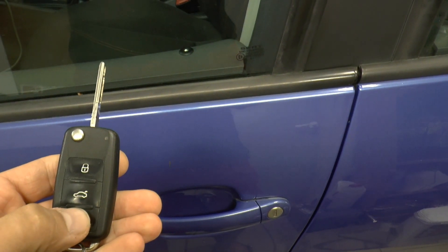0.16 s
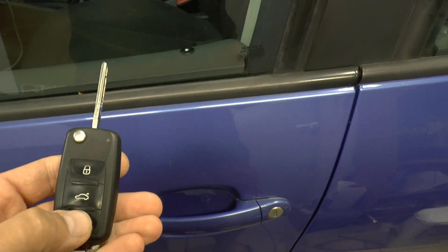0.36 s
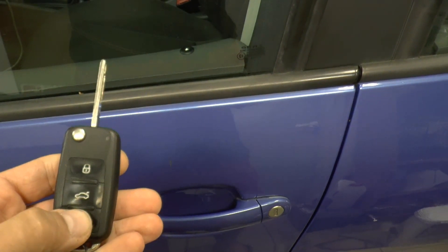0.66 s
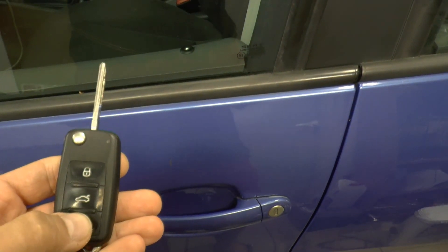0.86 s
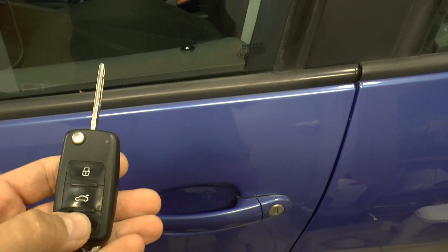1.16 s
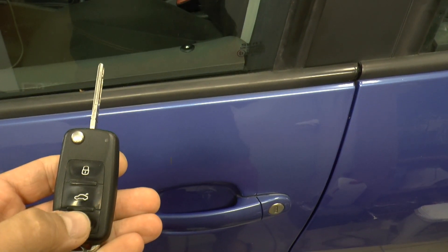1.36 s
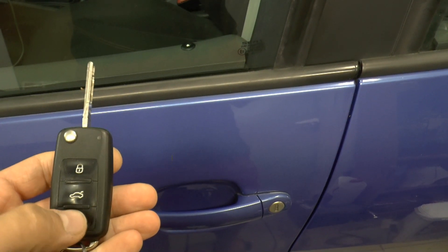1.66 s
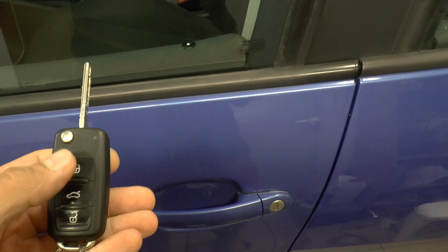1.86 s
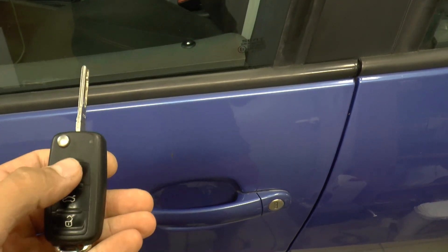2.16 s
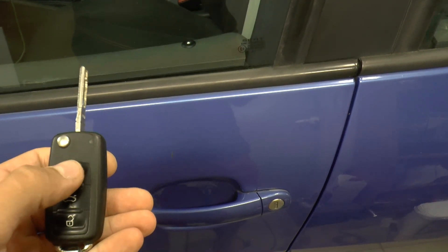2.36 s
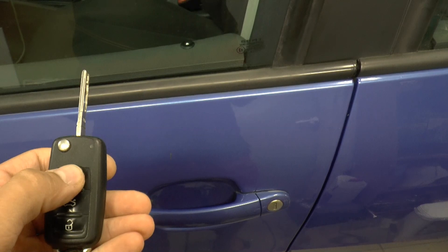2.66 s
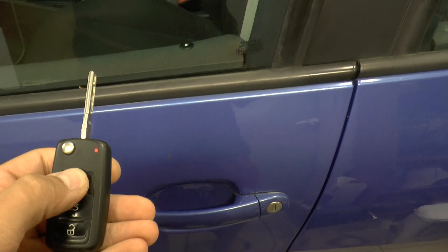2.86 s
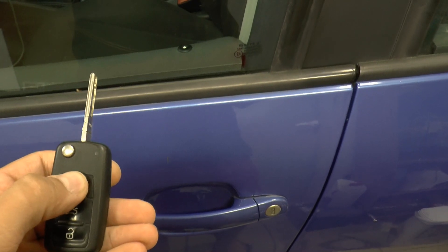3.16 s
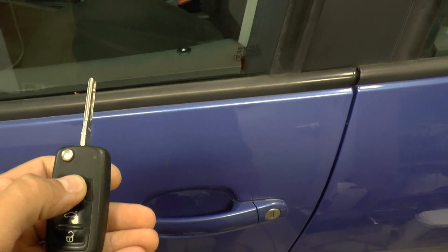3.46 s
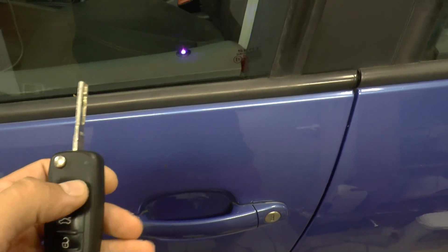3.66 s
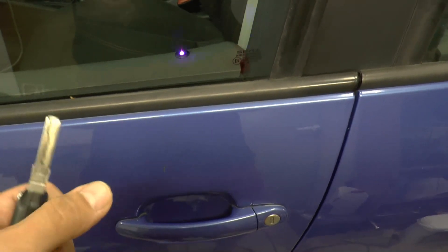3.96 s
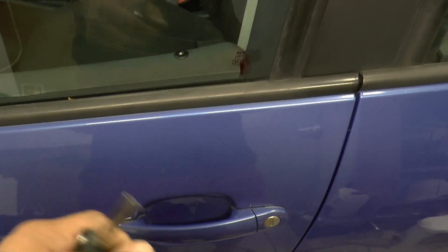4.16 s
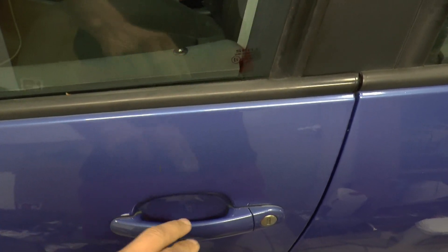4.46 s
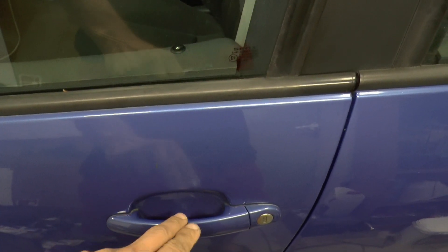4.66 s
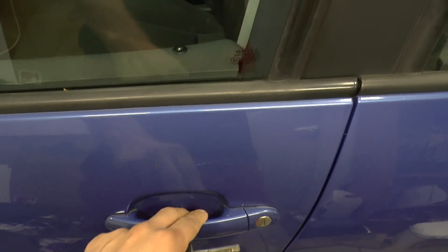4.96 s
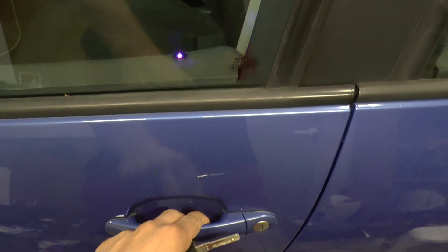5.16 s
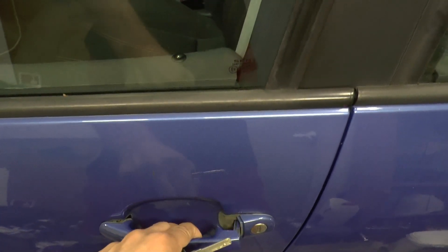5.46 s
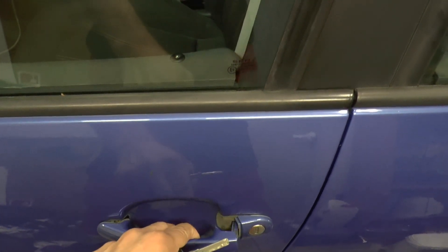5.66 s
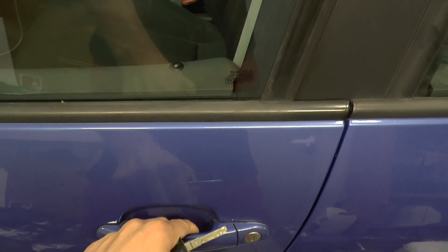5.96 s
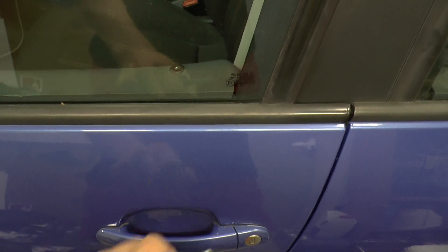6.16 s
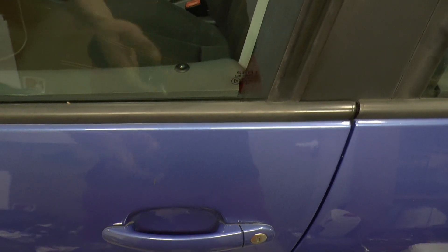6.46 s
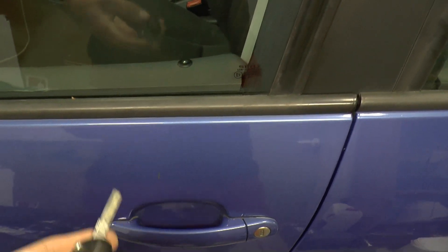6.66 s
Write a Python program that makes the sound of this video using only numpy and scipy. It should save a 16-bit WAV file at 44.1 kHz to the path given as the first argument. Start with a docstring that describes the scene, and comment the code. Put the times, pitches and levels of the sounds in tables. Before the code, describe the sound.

Car door locks clunk hard twice to unlock and twice to lock, then keys clink and a door handle creaks, knocks and snaps back.

```python
"""Door locks of a parked car in a quiet garage, heard from beside the driver's door. The lock actuators make
two strokes to unlock and two to lock: filtered noise blows, each a loud clunk and a soft spring return.
Key fob buttons click, and key and fob clack in the hand as short snaps with struck resonances. The door
handle is pulled to its stop, a stick-slip groan, and let go; its knocks excite the modes of the door.
Sleeve rub is uneven noise; room noise, a brief low drone and a faint motor whine of sines lie underneath."""
import sys
import numpy as np
from scipy import signal
from scipy.fft import rfft, irfft
from scipy.io import wavfile
from scipy.ndimage import uniform_filter1d

SR = 44100
rng = np.random.default_rng(int(sys.argv[2]) if len(sys.argv) > 2 else 0)


def unload_audio(sound):
    """Save the sound as a 16-bit wav file, at the path given as the first command line argument."""
    columns = np.transpose(np.atleast_2d(sound))
    # keep every value between -1 and 1, then stretch to whole-number steps
    steps = np.round(np.clip(columns, -1, 1) * 32767)
    wavfile.write(sys.argv[1], SR, steps.astype(np.int16))


N = 300762  # length in samples
SIZE = 24576  # longest single sound in samples
TIME = np.arange(N) / SR  # seconds into the scene
AGE = np.arange(SIZE) / SR  # seconds since a sound began
FREQ = np.maximum(np.fft.rfftfreq(SIZE, 1 / SR), 1)  # Hz
DECAY_60_DB = np.log(1000)  # exponent of a 60 dB decay

# Levels are relative: each sound's own function may add a gain.

# Spread of reflections between the microphones. Each row: frequency in Hz, side minus mid in dB.
MIC_SPREAD = [(25, -3), (70, -10.5), (150, -7), (500, -9), (1200, -11.5), (2200, -18), (4000, -18.5),
              (8000, -14)]
# Colour of the room air. Each row: frequency in Hz, density in dB per Hz.
AIR_COLOUR = [(15, -53), (25, -17), (64, 0.5), (101, -6), (215, -3), (289, -6), (368, -2.5), (469, -14.5),
              (598, -6), (1300, -22), (1660, -7.5), (2770, -8), (6730, -22.5), (11800, -18), (15500, -27)]
AIR_DB = -68.0
# Tones of a small motor. Each row: frequency in Hz, rms level in dB before the common lift.
WHINE_TONES = [(624.5, -87.5), (748.3, -87.5), (1061, -91), (1184, -92.5), (1249, -94), (1373, -89.5),
               (1626, -84.5), (1809, -81.5), (1933, -89), (1997, -90.5), (2180, -100.5), (2778, -84),
               (3090, -87), (3176, -89), (3225, -94), (3526, -86.5), (4199, -96), (4802, -93), (5098, -99),
               (5399, -92.5)]
WHINE_LIFT_DB = 1.16
# Colour of the low drone. Each row: frequency in Hz, density in dB per Hz.
DRONE_COLOUR = [(50, -43), (68, -24.5), (74, 2), (80, -13.5), (110, -46.5)]
# Course of the low drone. Each row: time in seconds, level in dB.
DRONE_COURSE = [(0, -86), (1.0, -71.0), (1.8, -83.5), (2.3, -105)]

# Decay in and around the car. Each row: frequency in Hz, t60 in seconds before stretching.
CAR_DECAY = [(60, 1), (180, 0.46), (500, 0.31), (1200, 0.21), (3000, 0.29), (6000, 0.27), (14000, 0.23)]
# Colour of a click. Each row: frequency in Hz, density in dB per Hz.
CLICK_COLOUR = [(100, -15), (950, -37.5), (1700, -2), (3000, -2.5), (4600, -2.5), (6000, -6.5),
                (10000, -11), (15000, -21)]
# Resonances of the fob, key blade and ring. Each row: frequency in Hz, level in dB, t60 in seconds.
KEY_MODES = [(1790, -14, 0.062), (2450, -17, 0.074), (3020, -4, 0.11), (3620, -3, .06), (5700, 3, 0.031),
             (6370, 5, 0.018), (7150, 1, .035), (10000, 1.5, 0.011)]
# Presses of the fob's buttons. Each row: start in seconds, level in dB.
BUTTON_PRESSES = [(0.4409, -47.5), (2.9155, -39.5), (3.129, -50)]
# Snaps of the latch pawl. Each row: start in seconds, level in dB.
LATCH_SNAPS = [(5.3151, -45), (5.8378, -27.5), (5.9363, -35)]

# Lock strokes, two to unlock and two to lock. Each row: start in seconds, travel in seconds,
# first blow in dB, its treble in dB, stop in dB, stop bass in dB, stop crack in dB, thud in dB,
# sway in dB, spring return in dB, run-back in seconds.
LOCK_STROKES = [(.691, .0135, -28, -4, -19.5, 1, -8.5, -25, -32, -40.5, 0.062),
                (1.0392, .0207, -22, -5, -17, -5.5, 4, -31, -38, -37.5, .04),
                (3.158, .0262, -28.5, -4, -19, 1.5, -4, -33, -34.5, -37, .06),
                (3.461, 0.027, -26, 1, -20.5, 2, -3.5, -27, -42, -42, .035)]
# Colour of the lock mechanism's rattle. Each row: frequency in Hz, density in dB per Hz.
RATTLE_COLOUR = [(30, -28.5), (90, -11), (150, -7.5), (430, -0.5), (485, -8), (560, -1.5), (760, -1.5),
                 (920, -10.5), (1250, -4.5), (1700, -1), (2400, 3), (4500, -4), (11500, -21), (15000, -35)]
# Door panel and cavity modes. Each row: frequency in Hz, level in dB, t60 in seconds.
DOOR_MODES = [(71.7, -21, 0.99), (139.1, -0.5, 0.37), (160, -6, 0.33), (210.3, -3.5, 0.24),
              (236.1, -4, 0.28), (287, -3, 0.21), (338.7, -14.5, 0.24), (411.3, 0, 0.11),
              (554.5, -0.5, 0.15), (589, -7, 0.22), (713, -7.5, 0.26), (709.3, 3, 0.36), (762, -3.5, 0.1),
              (805, 3, .2), (1400, 2.5, 0.14), (1653, -6, 0.13), (1730, 0.5, 0.1), (2134, -11.5, 0.068),
              (2327, -10, 0.24), (2830, -10, 0.26)]
# Resonances of the lock housing. Each row: frequency in Hz, level in dB; only differences count.
HOUSING_MODES = [(2062, -52), (2169, -52), (2272, -53.5), (2315, -49.5), (2762, -52), (3548, -56),
                 (3865, -57), (3967, -57), (4355, -60)]
HOUSING_WIDTH_HZ, HOUSING_GAIN = 14, 0.7
# The actuators lie to the right. Each row: frequency in Hz, left minus right in dB.
LOCK_LEAN = [(200, 0), (500, -.8), (1000, -3.4), (2000, -3.4), (4000, -1.5), (8000, -2), (13000, -1.3)]
LOCK_WIDTH, HAND_PAN_DB = 1.3, 1.1  # the door panel radiates broadly; the hand is a little to the left
SPIN_UP_S, MOTOR_DB, RUN_BACK_DB = .016, -50.5, -41.5
LEVER_LEAD_S, LEVER_DB = .0085, -4.5  # the lever trips just before the stop; level against the stop
REBOUND_S, REBOUND_DB = .0115, -4  # one bounce back from the stop; level against the stop
POWER_S, SETTLE_S = .246, .0105  # power is cut; a spring takes up the gears, which then settle
ROD_HZ, SWAY_S, SWAY_HZ = 300, .034, 153  # the rod thuds at the stop, then the door skin swings back
SETTLE_THUD_DB = -4.5  # level against the spring return

# Clinks of fob, blade and ring in the hand. Each row: start in seconds, level in dB, ring in Hz,
# treble in dB, metal share from 0 to 1, tail in dB.
KEY_CLINKS = [(3.903, -39.5, 2650, 9, .15, -11), (3.9561, -37.5, 2370, 0, 0.5, -9),
              (4.0129, -33, 2530, 12, .5, -7.5), (4.0204, -39, 10000, 4, .5, -7),
              (4.591, -46, 3400, -10.5, 0.2, -10), (4.9786, -46.5, 2380, 7.5, 0.93, -8),
              (6.6133, -41, 2580, 4, .5, -12), (6.6925, -43.5, 3160, 10, 1, -12),
              (6.7472, -24.5, 2926, 7, .9, -14)]
BOUNCE_S, BOUNCE_DB = .0025, -6  # parts touch twice; the metal share also scales the second touch
JINGLE_S, JINGLE_LENGTH_S, JINGLE_DB = 3.2, 0.031, -46  # the ring rattles lightly as the key is turned over
SUSTAIN_DB, SUSTAIN_T60_S = -13, .09  # the struck metal part rings on
# Rubs of sleeve and hand with each move. Each row: middle in seconds, length in seconds, level in dB.
SLEEVE_RUBS = [(3.943, 0.23, -58.5), (4.204, 0.25, -60.5), (5.422, .22, -58), (5.937, 0.19, -57.5),
               (6.359, 0.28, -61), (6.72, 0.26, -63)]
# Colour of the rubbing. Each row: frequency in Hz, density in dB per Hz.
SLEEVE_COLOUR = [(180, -58.5), (300, -10.5), (403, -0.5), (490, -17), (726, -7), (991, -25), (1760, -7),
                 (2970, -1.5), (15000, -26)]
REST_DB = -71  # from the middle of the first rub on, the hand is never quite still
# Scrapes of the key on its ring. Each row: start in seconds, length in seconds, pitch in Hz, level in dB.
KEY_SCRAPES = [(3.954, 0.053, 2680, -51.5), (6.554, 0.056, 3250, -62.5), (6.672, 0.039, 3100, -59)]

# Knocks of the handle on the door skin. Each row: start in seconds, thud in dB, contact in Hz, rattle in dB.
HANDLE_KNOCKS = [(4.893, -55, 166, -67), (5.314, -36.5, 210, -41.5), (5.4944, -20, 153, -37),
                 (5.971, -36.5, 199, -44), (6.011, -33.5, 245, -45)]
# The handle linkage is softer than the lock gears. Each row: frequency in Hz, gain in dB.
LINKAGE_TONE = [(150, -1.5), (400, 6), (650, 2.5), (1100, 4), (2500, -4), (8000, -9.5)]
# The handle bumps ever harder as it slides home.
SLIDE_S, SLIDE_LENGTH_S, SLIDE_RATTLE_DB = 5.867, .131, -53.5
SLIDE_DB, SLIDE_DB_PER_S, SLIDE_HZ, SLIDE_HZ_PER_S = -45.5, 36, 204, 600
# The hinge is loaded, then groans until the handle meets its stop.
LOAD_S, GROAN_S, GROAN_END_S, GROAN_ATTACK_S = 5.2, 5.362, 5.495, 0.0079
# The slip rate climbs during the load, peaks as the groan starts and then sags.
LOAD_DB, GROAN_DB, GROAN_HZ, SAG_HZ_PER_S = -58, -42.5, 216, 210
# Colour of the linkage's rasp. Each row: frequency in Hz, density in dB per Hz.
RASP_COLOUR = [(35, -42), (100, -19), (260, 15), (480, -20), (800, 2.0), (950, -21.5), (1500, -13), (5000, -34)]
# Modes of the fob's plastic case. Each row: frequency in Hz, level in dB, t60 in seconds.
CASE_MODES = [(1400, -1, 0.025), (1625, -2.5, 0.035), (1890, -1.5, 0.04), (2230, -10, 0.048)]
CLACK_S, CLACK_DB = 6.6398, -28  # the case knocks once
TOP_HZ = 15300  # upper limit of the recorder


def undb(db):
    """Decibels to gain."""
    return 10 ** (np.asarray(db) / 20)


def curve(points, hz=FREQ):
    """Read (Hz, value) points on a log-frequency axis."""
    f, value = np.transpose(sorted(points))
    return np.interp(np.log(hz), np.log(f), value)


def unit(x):
    """Scale to rms 1."""
    return x / np.sqrt(np.mean(x ** 2))


def add(out, s, sound):
    """Mix a sound in at time s."""
    start = int(s * SR)
    out[:, start:start + SIZE] += sound[..., :N - start]


def colour(x, gain):
    """Causal, minimum-phase filter with the given gain at each frequency."""
    cepstrum = irfft(np.log(gain + 1e-6))
    cepstrum[1:SIZE // 2] *= 2
    cepstrum[SIZE // 2 + 1:] = 0
    return irfft(rfft(x) * np.exp(rfft(cepstrum)))


def noise(size, width):
    """Spectrum of stereo noise; width scales how unlike the two sides are."""
    hz = np.maximum(np.fft.rfftfreq(size, 1 / SR), 1)
    mid, side = rfft(rng.standard_normal((2, size)))
    side = side * width * undb(curve(MIC_SPREAD, hz))
    return np.array([mid + side, mid - side]), hz


def wash(points, width):
    """Steady stereo noise of a given colour."""
    spectrum, hz = noise(N, width)
    return unit(irfft(spectrum * undb(curve(points, hz)), N))


def uneven(length, count):
    """Loosely spaced moments over a length of time."""
    jitter = rng.uniform(-.1, .1, count) / count
    return length * (np.linspace(0, 1, count) + jitter)


def pan(x, points):
    """Lean each band to the left by its dB."""
    hz = np.maximum(np.fft.rfftfreq(N, 1 / SR), 1)
    lean = undb(curve(points, hz) / 2)
    return irfft(rfft(x) * np.array([lean, 1 / lean]), N)


def background():
    """Room air and a small motor's steady whine, with a low drone that swells for a second and fades away."""
    whine = np.zeros(N)
    for hz, db in WHINE_TONES:
        whine += undb(db) * np.sqrt(2) * np.sin(2 * np.pi * (hz * TIME + rng.random()))
    drone = wash(DRONE_COLOUR, width=0.98)
    drone_db = np.interp(TIME, *np.transpose(DRONE_COURSE))
    air = undb(AIR_DB) * wash(AIR_COLOUR, width=1.92)
    return air + undb(WHINE_LIFT_DB) * whine + undb(drone_db) * drone


def tail(stretch):
    """Dense reflections; each band dies at its own rate."""
    spectrum, _ = noise(SIZE, width=0.74)
    out = np.zeros((2, SIZE))
    for hz, t60 in CAR_DECAY:
        # each band fades out towards its neighbours' frequencies
        band = curve([(f, float(f == hz)) for f, _ in CAR_DECAY])
        out += irfft(spectrum * band) * np.exp(-DECAY_60_DB * AGE / (t60 * stretch))
    return out


def crack(t60, snap):
    """The direct sound of a contact: a sharp snap and a brief chatter."""
    spectrum, _ = noise(SIZE, width=0.87)
    sound = irfft(spectrum) * (undb(-60 * AGE / t60) + snap * np.exp(-AGE / 0.0014))
    # same energy as 2 ms of rms 1
    return sound / np.linalg.norm(sound[0]) * np.sqrt(SR / 500)


def emphasis(modes, blur):
    """Gain of a body that favours the neighbourhood of its modes; blur widens each peak."""
    hz, db, t60 = np.transpose(modes)[..., None]
    half_width = blur * DECAY_60_DB / (2 * np.pi * t60)
    return np.sum(undb(db) / (1 + ((FREQ - hz) / half_width) ** 2), axis=0)


def click(ring_hz, width_hz, peak, treble_db, metal, room_db):
    """A small hard part snaps with one broad resonance; metal contacts bring out the key's modes."""
    resonance = 1 + peak / (1 + ((FREQ - ring_hz) / width_hz) ** 2)
    metal_body = 1 + 2 * metal * emphasis(KEY_MODES, blur=2.4)
    tone = undb(curve([(3500, 0.0058), (8000, treble_db)]))
    gain = unit(undb(curve(CLICK_COLOUR)) * metal_body * resonance) * tone
    snap = crack(t60=.015, snap=2.6)
    return undb(-3.0) * colour(snap + undb(room_db) * tail(stretch=0.55), gain)


def snaps():
    """The plastic buttons tick close by; the latch pawl snaps in the door with more of the room."""
    out = np.zeros((2, N))
    for s, db in BUTTON_PRESSES:
        tick = click(ring_hz=2130, width_hz=350, peak=3.3, treble_db=-4.5, metal=0.36, room_db=-18)
        add(out, s, undb(db) * tick)
    for s, db in LATCH_SNAPS:
        snap = click(ring_hz=3500, width_hz=490, peak=2.5, treble_db=-4.5, metal=0.32, room_db=-8.5)
        add(out, s, undb(db) * snap)
    return out


def door_colour():
    """Anything that rattles inside the door is heard through its panel."""
    return unit(undb(curve(RATTLE_COLOUR)) * (1 + 1.3 * emphasis(DOOR_MODES, blur=2.4)))


def whirr(running, treble_db):
    """A small motor turns for a moment; its gear teeth chop the noise."""
    teeth = 1 + 0.42 * np.sin(2 * np.pi * 380 * AGE)
    tone = door_colour() * undb(curve([(1000, 0.00046), (7000, treble_db)]))
    gears = colour(irfft(noise(SIZE, width=.9)[0]) * teeth * running, tone)
    hum = 0.73 * running * np.sin(2 * np.pi * 755 * AGE)
    return undb(-6) * (gears + hum)


def motors():
    """The motors drive each stroke, then are spun back by the spring and coast to rest."""
    out = np.zeros((2, N))
    for s, travel, *_, run_back in LOCK_STROKES:
        driven = np.clip(np.minimum(AGE, SPIN_UP_S + travel - AGE) / 0.0089, 0, 1)
        coasting = np.minimum(AGE / .008, 1) * np.exp(-AGE / run_back)
        add(out, s - SPIN_UP_S, undb(MOTOR_DB) * whirr(driven, treble_db=-1.5))
        add(out, s + POWER_S + SETTLE_S, undb(RUN_BACK_DB) * whirr(coasting, treble_db=-10))
    return out


def housing():
    """The lock's casing favours a few narrow bands."""
    hz, db = np.transpose(HOUSING_MODES)[..., None]
    peaks = undb(db - db.max()) / (1 + ((FREQ - hz) / HOUSING_WIDTH_HZ) ** 2)
    return 1 + HOUSING_GAIN * np.sum(peaks, axis=0)


def blow(bass_db, treble_db, crack_db):
    """A gear or lever hits its stop inside the door; loose parts bounce, then settle."""
    tone = undb(curve([(600, bass_db), (1500, 0.0055), (3000, 0.029),
                       (6500, treble_db), (12000, treble_db), (15500, treble_db - 11)]))
    through_door = 1 - np.exp(-AGE / 0.0013)  # the blow takes a moment to spread through the panel
    settling = np.exp(-AGE / 0.025)
    flutter = unit(uniform_filter1d(rng.standard_normal(SIZE), size=90))
    bounces = undb(2.64 * flutter * settling)
    clatter = tail(stretch=0.84) * (1 + 0.5 * settling) * bounces
    contact = undb(crack_db) * crack(t60=0.015, snap=1.2)
    return colour(undb(-6.5) * clatter * through_door + contact, door_colour() * housing() * tone)


def actuators():
    """Each stroke takes up the slack, trips the lever, hits the stop and rebounds; later a spring pulls it back."""
    out = np.zeros((2, N))
    for s, travel, first_db, first_treble_db, stop_db, bass_db, crack_db, _, _, return_db, run_back in LOCK_STROKES:
        stop, cut = s + travel, s + POWER_S
        add(out, s, undb(first_db) * blow(bass_db=2.5, treble_db=first_treble_db, crack_db=-9))
        add(out, stop - LEVER_LEAD_S, undb(stop_db + LEVER_DB) * blow(bass_db=1.5, treble_db=3.5, crack_db=-10))
        add(out, stop, undb(stop_db) * blow(bass_db, treble_db=0.9, crack_db=crack_db))
        rebound = blow(bass_db / 2, treble_db=-2.0, crack_db=-13.5)
        add(out, stop + REBOUND_S, undb(stop_db + REBOUND_DB) * rebound)
        # spring return: take-up, settling, and one more blow during the run-back
        add(out, cut, undb(return_db - 6) * blow(bass_db=6, treble_db=-5, crack_db=-5))
        add(out, cut + SETTLE_S, undb(return_db) * blow(bass_db=5, treble_db=-11, crack_db=-6.5))
        add(out, cut + run_back / 2, undb(return_db - 4) * blow(bass_db=7.5, treble_db=-10.5, crack_db=-14))
    return out


def ring(modes, scatter_db):
    """Struck modes; every blow excites them a little differently."""
    hz, db, t60 = np.transpose(modes)[..., None]
    size, detune = rng.standard_normal((2, len(modes), 1))
    age = AGE[:SIZE * 3 // 4]  # the rest stays silent
    waves = np.sin(2 * np.pi * hz * (1 + 0.005 * detune) * age) * np.exp(-DECAY_60_DB * age / t60)
    return np.pad(np.sum(undb(db + scatter_db * size) * waves, axis=0), (0, SIZE // 4))


def low_cut(hz):
    """A small panel radiates little below its size."""
    return 1 / np.sqrt(1 + (hz / FREQ) ** 4)


def thud(contact_hz):
    """A cushioned knock pushes the door skin slowly, so mostly its low modes answer."""
    ratio = FREQ / contact_hz
    band = 1 / np.sqrt(1 + (2.7 * (ratio - 1 / ratio)) ** 2)
    push = band / (1 + (ratio / 1.51) ** 4)
    return colour(ring(DOOR_MODES, scatter_db=3.0), push * low_cut(hz=117))


def rods():
    """The lock rod shakes the door skin at both ends of its travel."""
    out = np.zeros((2, N))
    for s, travel, *_, thud_db, sway_db, return_db, _ in LOCK_STROKES:
        add(out, s + travel, undb(thud_db) * thud(contact_hz=ROD_HZ))
        add(out, s + travel + SWAY_S, undb(sway_db) * thud(contact_hz=SWAY_HZ))
        add(out, s + POWER_S + SETTLE_S, undb(return_db + SETTLE_THUD_DB) * thud(contact_hz=ROD_HZ))
    return out


def key():
    """The key clinks in the hand; the more metal in a contact, the more it bounces and rings."""
    out = np.zeros((2, N))
    jingle = [(JINGLE_S + t, JINGLE_DB, 2600, 10, .45, -3) for t in uneven(JINGLE_LENGTH_S, count=3)]
    for s, db, ring_hz, treble_db, metal, tail_db in KEY_CLINKS + jingle:
        for delay, gain in [(0, 1), (BOUNCE_S, metal * undb(BOUNCE_DB))]:
            touch = click(ring_hz, width_hz=380, peak=4.3, treble_db=treble_db, metal=metal, room_db=tail_db)
            add(out, s + delay, undb(db) * gain * touch)
        sustain = ring([(ring_hz, SUSTAIN_DB, SUSTAIN_T60_S)], scatter_db=1)
        add(out, s, undb(db) * metal * sustain)
    return out


def sleeve():
    """Cloth and skin rub in uneven little slips and grains; each move of the hand swells and fades."""
    slips = unit(uniform_filter1d(rng.standard_normal(N), size=500))
    grains = unit(uniform_filter1d(rng.standard_normal(N), size=60))
    moves = sum(undb(db) * np.exp(-(2 * (TIME - s) / length) ** 2) for s, length, db in SLEEVE_RUBS)
    restless = undb(REST_DB) * (TIME > SLEEVE_RUBS[0][0])
    roughness = undb(1.7 * slips + 1.8 * grains - 2.3)
    return wash(SLEEVE_COLOUR, width=0.75) * np.hypot(moves, restless) * roughness


def scrapes():
    """Metal slides on metal and sings roughly in one narrow band."""
    out = np.zeros((2, N))
    for s, length, hz, db in KEY_SCRAPES:
        stroke = np.sqrt(np.clip(np.sin(np.pi * np.minimum(AGE / length, 1)), 0, 1))
        band = unit(1 / (1 + ((FREQ - hz) / 170) ** 2))
        friction = irfft(noise(SIZE, width=0.41)[0]) * stroke
        add(out, s, undb(db) * colour(friction, band))
    return out


def knocks():
    """The handle knocks on the door and bumps along as it slides home; the linkage rattles each time."""
    out = np.zeros((2, N))
    body = door_colour() * undb(curve(LINKAGE_TONE))
    bumps = [(SLIDE_S + t, SLIDE_DB + SLIDE_DB_PER_S * t, SLIDE_HZ + SLIDE_HZ_PER_S * t, SLIDE_RATTLE_DB)
             for t in uneven(SLIDE_LENGTH_S, count=5)]
    for s, db, contact_hz, rattle_db in HANDLE_KNOCKS + bumps:
        rattle = undb(rattle_db - 2.0) * colour(tail(stretch=0.69), body)
        add(out, s, undb(db) * thud(contact_hz) + rattle)
    return out


def groan():
    """The hinge sticks and slips unevenly; the slips sound their fundamental with little below 120 Hz, and the
    linkage rasps along."""
    hz = GROAN_HZ - SAG_HZ_PER_S * np.abs(np.clip(TIME, LOAD_S, GROAN_END_S) - GROAN_S)
    load = undb(LOAD_DB) * np.clip((TIME - LOAD_S) / (GROAN_S - LOAD_S), 0, 1)
    attack = undb(GROAN_DB) * np.clip((TIME - GROAN_S) / GROAN_ATTACK_S, 0, 1)
    release = np.clip((GROAN_END_S - TIME) / .006, 0, 1)
    effort = (load + attack) * release
    wobble, grip = (unit(uniform_filter1d(row, size=260)) for row in rng.standard_normal((2, N)))
    phase = 2 * np.pi * np.cumsum(hz * (1 + 0.084 * wobble)) / SR
    slips = unit(np.sin(phase)) * (1 + 0.7 * np.tanh(grip))
    rasp = wash(RASP_COLOUR, width=1.0) * (1 + np.cos(phase) / 2)  # pulses with the slips
    high_pass = signal.butter(4, 120, "high", fs=SR, output="sos")
    return signal.sosfilt(high_pass, (slips + undb(-11) * rasp) * effort)


def fob():
    """The small, hollow plastic case gives one short clack with no bass."""
    out = np.zeros((2, N))
    contact = click(ring_hz=1830, width_hz=440, peak=3.3, treble_db=-4.5, metal=.1, room_db=-13)
    case = colour(ring(CASE_MODES, scatter_db=1), low_cut(hz=1150) ** 3)
    add(out, CLACK_S, undb(CLACK_DB) * (contact + undb(-3) * case))
    return out


def scene():
    """Locks to the right, the hand a little to the left, the room all around."""
    doors = actuators() + motors()
    middle = doors.mean(axis=0)
    locks = pan(middle + LOCK_WIDTH * (doors - middle), LOCK_LEAN)
    hand = knocks() + groan() + snaps() + key() + fob() + scrapes() + sleeve()
    hand_pan = undb(np.array([[HAND_PAN_DB], [-HAND_PAN_DB]]) / 2)
    return locks + rods() + hand * hand_pan + background()


def record(dry):
    """The recorder cuts the top with a steep low-pass."""
    return signal.sosfilt(signal.ellip(8, .2, 70, TOP_HZ, fs=SR, output="sos"), dry)


dry = scene()
out = record(dry)
unload_audio(out)
```